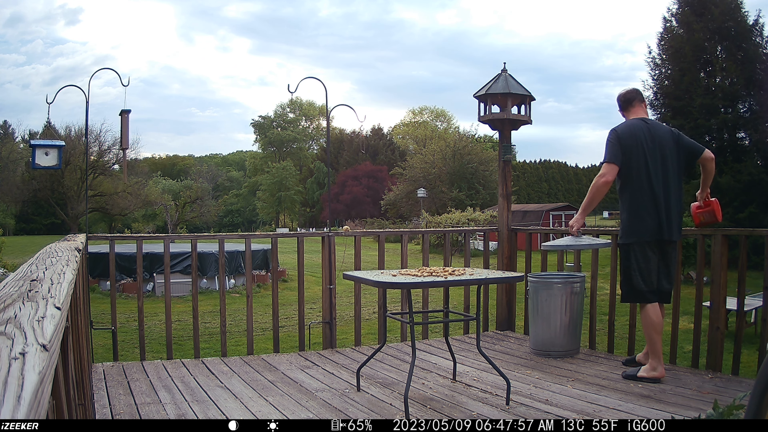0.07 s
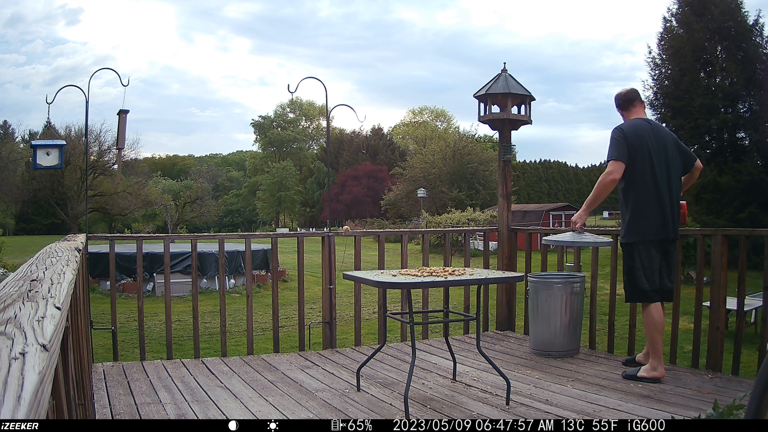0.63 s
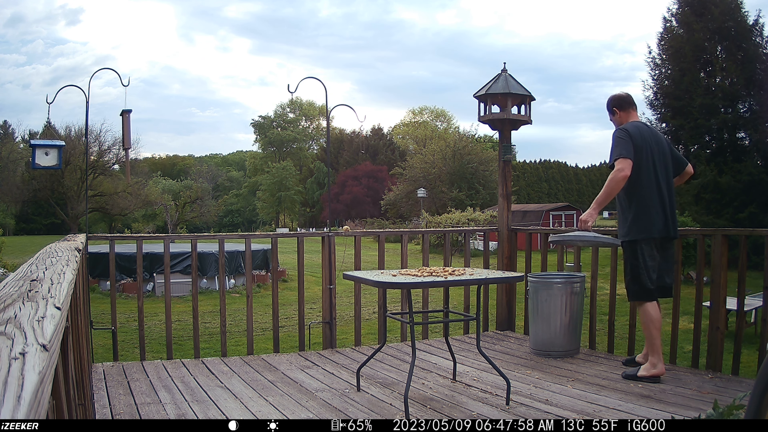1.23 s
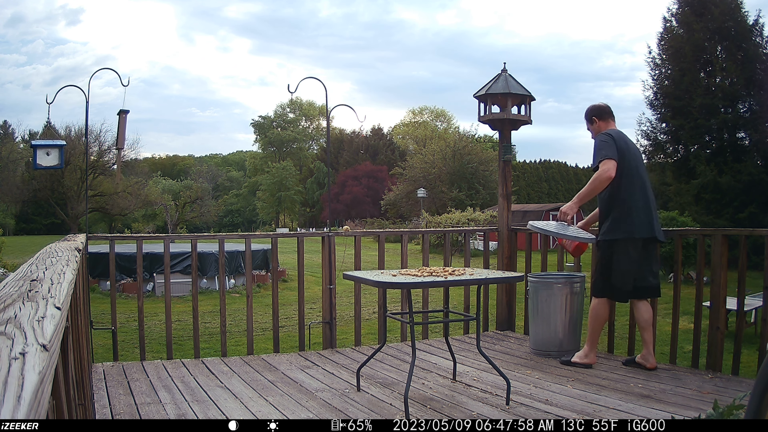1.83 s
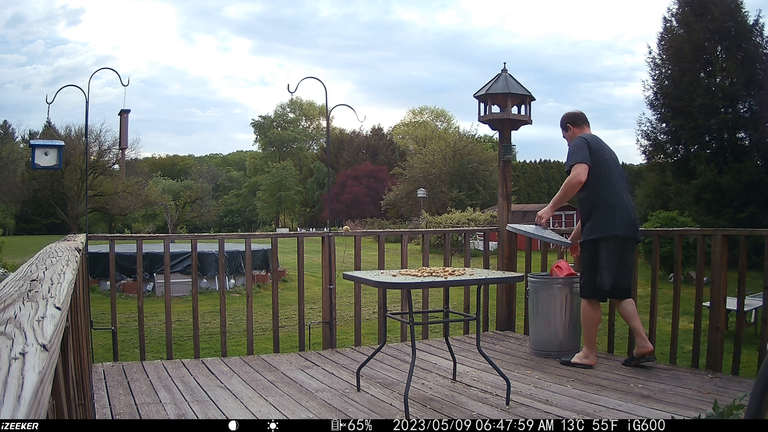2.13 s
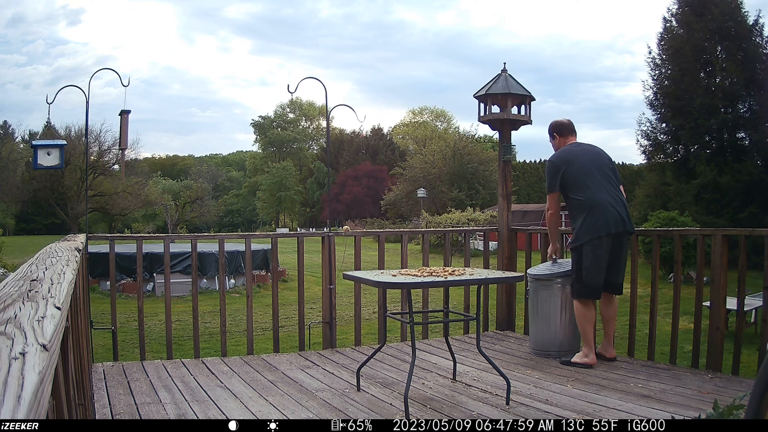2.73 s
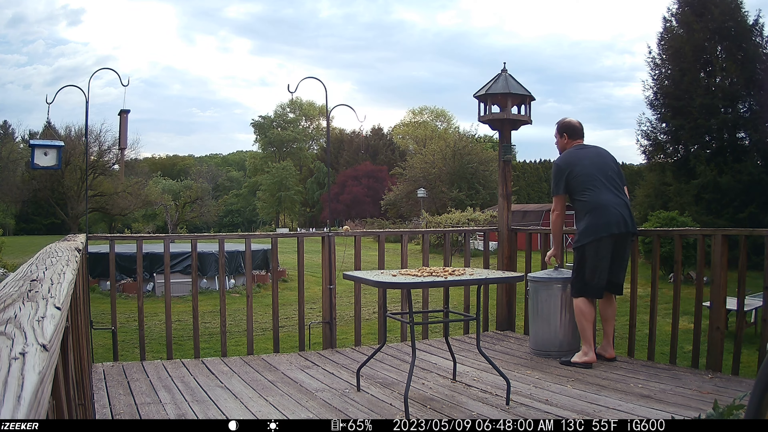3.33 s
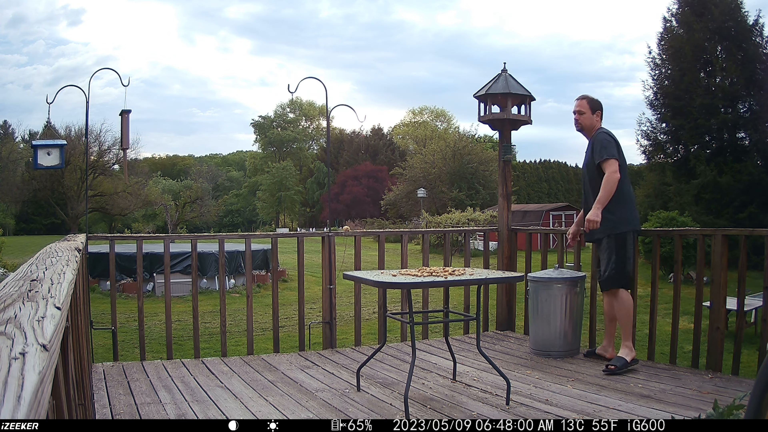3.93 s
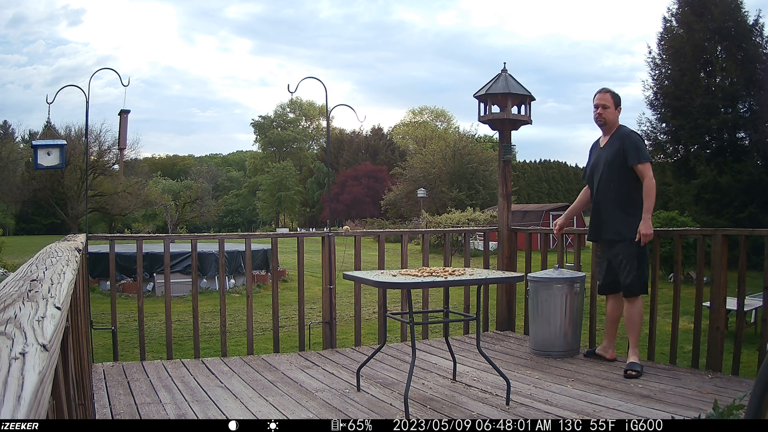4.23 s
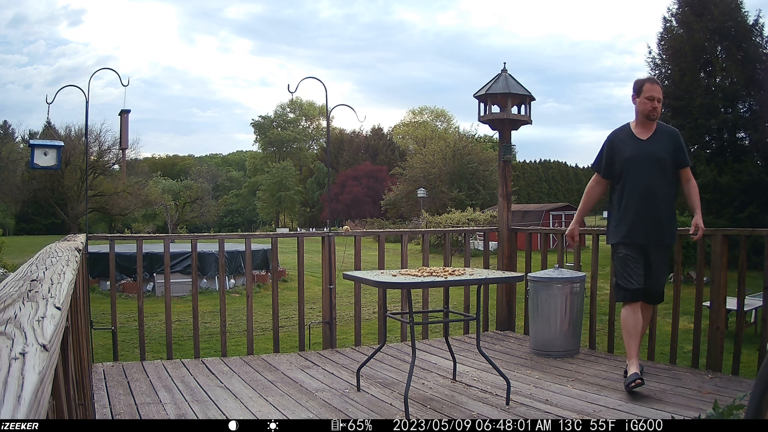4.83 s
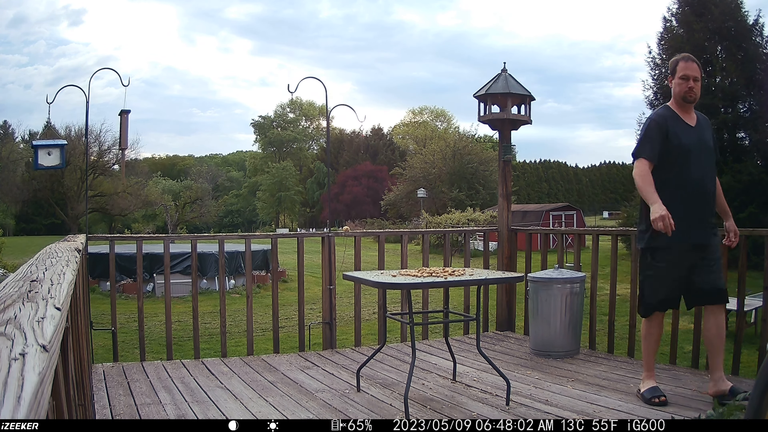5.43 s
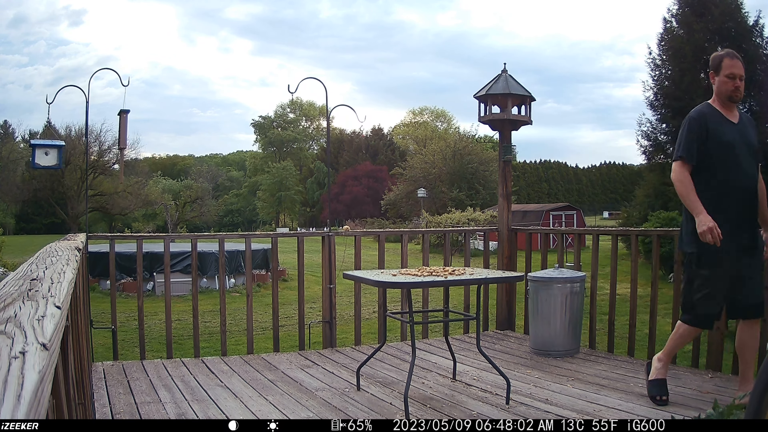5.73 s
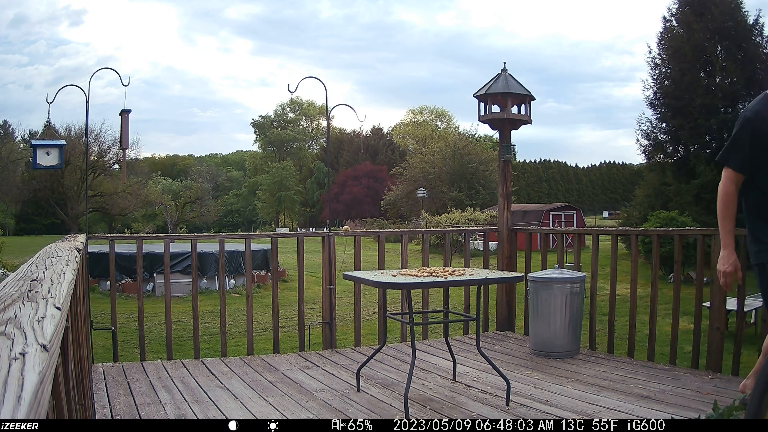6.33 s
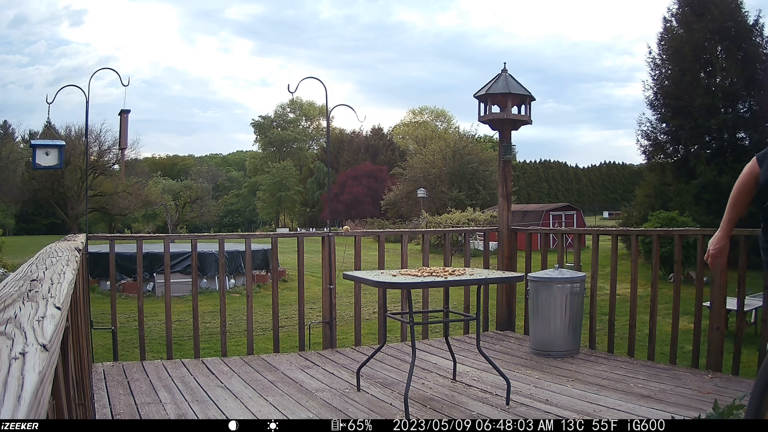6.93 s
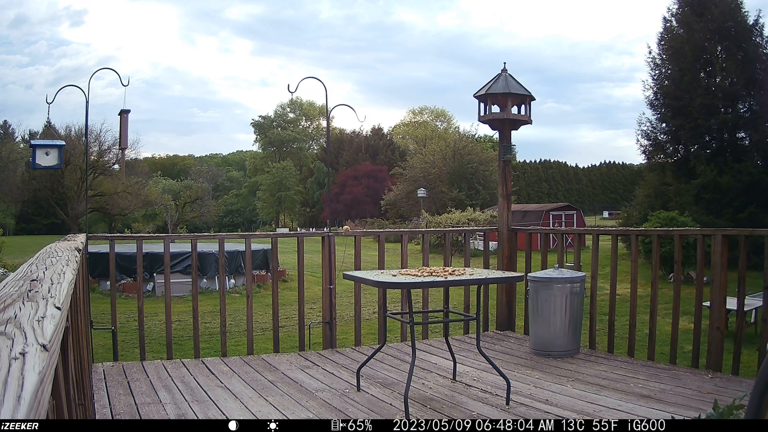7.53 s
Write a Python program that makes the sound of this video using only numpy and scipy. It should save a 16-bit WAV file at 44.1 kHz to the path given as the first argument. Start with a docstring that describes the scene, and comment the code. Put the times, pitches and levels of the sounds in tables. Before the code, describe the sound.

Faint birds chirp over a low outdoor rumble as a metal trash can lid clangs shut, followed by soft steps and close crackling.

```python
"""A sheet-metal lid is knocked, then clattered down onto a trash can on a wooden deck, a few metres
from a small camera's microphone. Each blow crashes through the sheet and sets lid and can ringing;
the air inside booms as the lid closes. Sandals scuff the boards, and something rustles and crackles
right beside the microphone. Songbirds call from the trees over a faint rumble and far traffic."""
import sys
import numpy as np
from scipy import signal
from scipy.fft import rfft, irfft
from scipy.io import wavfile
from scipy.ndimage import uniform_filter1d

SR = 44100
rng = np.random.default_rng(int(sys.argv[2]) if len(sys.argv) > 2 else 0)


def to_wav(s):
    """Save 16-bit WAV."""
    ch = np.atleast_2d(s).T  # columns
    pcm = np.round(np.clip(ch, -1, 1) * 32767)  # PCM
    wavfile.write(sys.argv[1], SR, pcm.astype(np.int16))


N = 339129
T = np.arange(N) / SR
# spectrum of whatever rustles and crackles beside the microphone: frequency_hz, density_db
RUSTLE_SPECTRUM = [(200, 2.5), (520, -3.5), (800, 4.5), (1250, 3.5), (2100, -4), (3400, 1.5), (4400, -1.5),
                   (6500, 1), (8200, -0.5), (10500, -7), (15000, -11)]


def lid():
    """Lid and can a few metres off: the metal crashes and rings, and the air shut inside booms."""
    # booms of the enclosed air: start_s, pitch_hz, level_db, t60_s
    booms = [(2.89, 97, -33, 0.48), (2.965, 138, -32, 0.12), (3.132, 110, -45.5, 0.21)]
    out, t = crash() + ring(), T[:SR]
    for s, hz, db, t60 in booms:
        add(out, s, undb(db) * np.sin(2 * np.pi * hz * t) * fade(t, t60))
    return outdoors(out, wet_db=-29.5, t60=.81, build_s=.05, dull_hz=1470)


def contacts(first_gap_s=.009, gap_ratio=.95):
    """Every blow of the lid and its rebounds, each sooner and weaker, in time order."""
    # blows of the lid, damped by hand and rim:
    # start_s, level_db, bass_db, treble_db, ring_db, clang_db, damping_db_per_s, rattle_s
    blows = [(2.267, -55.5, 3, 9, -12.5, 8.5, 235, .026), (2.7866, -47.5, 5, -2, -11, 5, 193, .012),
             (2.859, -37.5, 0, -1.5, -12.5, 12.5, 97, 0), (2.8903, -32.5, -0.5, 0, -10, 12.5, 77, .012),
             (2.924, -38, 5.5, 3, 0.5, -13, 200, 0), (2.9497, -37.5, 4, 6.5, -3, -17, 124, 0),
             (2.9627, -30, 7, -1.5, 0, -23, 167, .022), (2.992, -29.5, 5, -2, -5.5, -1.5, 155, .03),
             (3.045, -41, -4, -6, -8, 17, 2, 0), (3.13, -33, -2.5, -18.5, -14, 9, 180, .012)]
    gaps = first_gap_s * gap_ratio ** np.arange(10)
    rows = []
    for s, db, bass_db, treble_db, ring_db, clang_db, damping, rattle_s in blows:
        for k, late in enumerate([0, *np.cumsum(gaps)]):
            if late <= rattle_s:
                # each rebound lands more on the edge: less bass, more clang
                rows.append((s + late, db - 3 * k, bass_db - 4 * k, treble_db,
                             ring_db, clang_db + 3 * k, damping))
    return sorted(rows)


def push(hz, bass_db, treble_db, bass_hz=650, treble_hz=3200):
    """How hard a blow drives each frequency: flat blows push the low modes, edge blows the high."""
    return undb(bass_db / (1 + (hz / bass_hz) ** 4) + treble_db / (1 + (treble_hz / hz) ** 2))


def crash(ripple_db=1.5, ripple_from_hz=1500, tick_db=-6.5, tick_t60=.036):
    """Each contact gives a tick and a crash of crowded sheet modes, each band dying at its own rate."""
    # overlapping modes of the sheet metal: frequency_hz, density_db, t60_s
    sheet_bands = [(82.5, -11, 0.56), (151, 1, 0.46), (252, -4.5, 1), (450, -2, 0.52), (660, -1, 0.78),
                   (760, -7.5, 0.85), (1080, -3.5, 0.55), (1420, -6, 0.13), (2220, -9, 0.66),
                   (3430, -10, 0.52), (4530, -5.5, 0.38), (7350, -8.5, 0.25), (9360, -19.5, 0.54),
                   (15000, -29, 0.42)]
    hz, db, t60 = np.transpose(sheet_bands)
    out, t = np.zeros(N), T[:2 ** 15]
    f = freqs(t)
    # the same sheet answers every blow, so its fine peaks and dips stay put
    ripple = unit(uniform_filter1d(rng.standard_normal(len(f)), size=24)) * f / (f + ripple_from_hz)
    sheet = unit(undb(np.interp(np.log(f), np.log(hz), db) + ripple_db * ripple))
    bands = np.array([np.interp(np.log(f), np.log(hz), row) for row in np.eye(len(hz))])
    decays = np.array([fade(t, s) for s in t60])
    for s, level_db, bass_db, treble_db, _, _, damping in contacts():
        body, contact = rfft(rng.standard_normal((2, len(t)))) * sheet * push(f, bass_db, treble_db)
        wash = np.sum(irfft(body * bands) * decays, axis=0)
        tick = undb(tick_db) * fade(t, tick_t60) * irfft(contact)
        add(out, s, (wash + tick) * undb(level_db - damping * t))
    return out


def ring(rim_hz=1740, rim_width_hz=300):
    """The clear modes gather energy from every contact and lose it again until the next."""
    # clear modes of lid and can: pitch_hz, level_db, t60_s
    modes = [(192, -11, .35), (302, -10, .45), (322, -14, .45), (344, -13, .6), (411, -12, .4),
             (448, -8, .35), (478, -8, .35), (543, -12, .4), (643, -3, .5), (718, -13, .45), (868, -9, .5),
             (1028, -12, .44), (1200, -9, .46), (1400, -10, .45), (1545, -12, .25), (1684, -7, .45),
             (1702, -12, .4), (1775, -14, .3), (1868, -14, .45), (2062, -11, .55), (2126, -16, .5),
             (2444, -14, .4), (2576, -13, .42), (2727, -12, .42), (3219, -13, .4), (4531, -10, .35),
             (4560, -9, .35), (4748, -12, .35), (5632, -14, .32)]
    hz, db, t60 = np.transpose(modes)[:, :, None]
    out, energy = np.zeros(N), 0
    phase = 2 * np.pi * rng.random(hz.shape)
    rim = 1 / (1 + ((hz - rim_hz) / rim_width_hz) ** 2)
    hits = contacts()
    ends = [row[0] for row in hits[1:]] + [hits[-1][0] + 1]
    for (s, level_db, bass_db, treble_db, ring_db, clang_db, damping), end in zip(hits, ends):
        t = T[:max(int(end * SR) - int(s * SR), 1)]
        kick = undb(level_db + ring_db + db + clang_db * rim) * push(hz, bass_db, treble_db)
        swing = np.sqrt(energy + kick ** 2) * np.exp(-np.log(1000) * t / t60) * undb(-damping * t)
        # each contact also jolts the modes out of step, which roughens the ring
        angle = phase + .5 * rng.standard_normal(hz.shape) + 2 * np.pi * hz * t
        add(out, s, np.sum(swing * np.sin(angle), axis=0))
        energy, phase = swing[:, -1:] ** 2, angle[:, -1:]
    return out


def steps():
    """A sandal brushes the boards while the deck thuds under the weight."""
    # footfalls: start_s, scuff_length_s, scuff_db, thud_db
    footfalls = [(1.58, .097, -73.5, -78), (2.308, 0.086, -67.5, -49), (2.397, 0.026, -62, -72),
                 (4.305, .049, -72.5, -65), (4.777, 0.043, -67.5, -71), (5.101, 0.034, -73, -60),
                 (5.67, .059, -71.5, -69), (6.404, 0.025, -64, -55), (6.84, 0.049, -74, -52.5)]
    # spectra of sole and deck: frequency_hz, density_db
    sole = [(150, 6.5), (700, 1), (2000, 1.5), (6000, -1.5), (15000, -11)]
    deck = [(15, -6), (40, 5), (80, -11.5), (180, -10.5), (400, -22), (2000, -56)]
    out, t = np.zeros(N), T[:SR // 2]
    for s, length, scuff_db, thud_db in footfalls:
        grit, weight = rng.standard_normal((2, len(t)))
        stroke = 3 * t / length
        scuff = colour(grit, sole) * stroke * np.exp(1 - stroke)
        thud = colour(weight, deck) * fade(t, t60=.29) * (1 - np.exp(-t / .008))
        add(out, s, undb(scuff_db) * scuff + undb(thud_db) * thud)
    return out


def rustle(slips_per_s=3500, catch_db=2, catch_hz=130):
    """Right beside the microphone, a dense run of tiny slips catches unevenly."""
    sizes = undb(3 * np.minimum(rng.exponential(size=N), 3))
    slips = (rng.random(N) < slips_per_s / SR) * rng.choice([-1, 1], N) * sizes
    friction = colour(unit(slips) + .5 * rng.standard_normal(N), RUSTLE_SPECTRUM)
    return friction * rustle_level() * undb(catch_db * walk(catch_hz))


def rustle_level(from_s=7.095, to_s=7.235, hold_db=-53.5, rise_db_per_s=162, drop_db_per_s=230):
    """The rustle swells, holds and drops quickly, then settles slowly."""
    before, after = np.maximum(from_s - T, 0), np.maximum(T - to_s, 0)
    settle_db = -8 - 32 * after
    release_db = np.maximum(-drop_db_per_s * after, settle_db)
    return undb(hold_db - rise_db_per_s * before + release_db)


def crackles(body_db=-2, gain_db=-2, t60=.022):
    """Sharp ticks and crackles close by: one tick with a footfall, the rest around the rustle."""
    # ticks and crackles: start_s, peak_db (before gain_db), centre_hz
    ticks = [(6.4004, -44.5, 3800), (7.009, -42.5, 8740), (7.082, -36, 6080), (7.1017, -34.5, 8050),
             (7.1374, -40, 8350), (7.1828, -35, 6850), (7.204, -30, 6660), (7.2292, -37, 4360),
             (7.293, -41.5, 2340), (7.3283, -40, 4380), (7.3587, -41.5, 6210), (7.3906, -41, 1550),
             (7.427, -46, 3900), (7.4835, -43, 5760)]
    out, t = np.zeros(N), T[:SR // 10]
    for s, db, hz in ticks:
        tick_noise, body_noise = rng.standard_normal((2, len(t)))
        body = undb(body_db) * colour(body_noise, RUSTLE_SPECTRUM)
        tick = (resonate(tick_noise, hz, width_hz=hz / 2) + body) * fade(t, t60)
        add(out, s, undb(db + gain_db) * tick / np.abs(tick).max())
    return out


def near_birds(whistle_s=.074, climb_s=.055):
    """Short, clean whistles and warbled carols from the nearer trees."""
    # whistles: start_s, pitch_hz, glide_hz_per_s, level_db
    whistles = [(.43, 3300, -2000, -74), (1.015, 3290, -2200, -74.5), (1.39, 3100, -5000, -80),
                (1.617, 3250, -1500, -73.5), (2.369, 2496, -1000, -74), (2.63, 2780, 3000, -74),
                (3.46, 5270, -2, -75.5), (3.635, 6200, -2, -78), (3.74, 3650, 2200, -74),
                (3.965, 3700, 2200, -74.5), (4.015, 2590, -700, -77), (4.068, 2940, 0, -78.5),
                (4.2, 3680, 2197, -76), (4.528, 3060, -1200, -76.5), (5.115, 3360, -2000, -78.5),
                (5.18, 2500, -3000, -77), (5.794, 2670, -4000, -75), (6.515, 2140, -3000, -76),
                (6.587, 3230, -1500, -74), (6.885, 2550, 700, -73.5), (7.455, 6000, -7000, -72),
                (7.535, 5850, -7000, -70)]
    # phrases that climb to a top note and step down: top_s, top_hz, fall_s, level_db
    carols = [(1.69, 3430, 0.12, -72.5), (6.345, 3450, 0.13, -73), (6.985, 3310, .08, -68.5),
              (7.535, 3420, 0.21, -71)]
    out = np.zeros(N)
    for s, hz, glide, db in whistles:
        bend = glide * whistle_s / 2
        add(out, s, undb(db) * note(whistle_s, hz - bend, hz, hz + bend, warble=.1))
    for s, top_hz, fall_s, db in carols:
        add(out, s - climb_s, undb(db) * carol(top_hz, climb_s, fall_s))
    return outdoors(out, wet_db=-9, t60=.4, build_s=.01, dull_hz=6000)


def carol(top_hz, climb_s, fall_s, overlap_s=.0143, scatter=.0255):
    """Three syllables run together, each a little off pitch: a climb, a steep fall, a low note."""
    out, step_s = np.zeros(N), fall_s / 2
    first, via, last = .77, .7, .61  # shares of the top pitch
    syllables = [(0, climb_s, first, (first + 1) / 2, 1),
                 (climb_s, step_s, 1, (1 + via) / 2, via),
                 (climb_s + step_s, step_s, via, last, last)]
    for s, length, *shares in syllables:
        pitches = top_hz * np.array(shares) * (1 + scatter * rng.standard_normal())
        add(out, s, note(length + overlap_s, *pitches, warble=.58))
    return out[:SR]


def note(length_s, start_hz, middle_hz, end_hz, warble, warble_hz=75, depth=.097):
    """A bird's whistle glides through three pitches with a quick, uneven warble."""
    u = np.linspace(0, 1, int(length_s * SR))
    glide = np.polyval(np.polyfit([0, .5, 1], [start_hz, middle_hz, end_hz], 2), u)
    drift = np.interp(u, np.linspace(0, 1, 8), rng.standard_normal(8))
    trill = np.sin(2 * np.pi * np.cumsum(warble_hz * (1 + .25 * drift)) / SR)
    pitch_hz = glide * (1 + depth * warble * trill)
    return np.sqrt(2) * np.sin(np.pi * u) * np.sin(2 * np.pi * np.cumsum(pitch_hz) / SR)


def far_birds(count=140, level_db=-81):
    """A faint chorus of random notes from farther off, smeared more by the trees."""
    out = np.zeros(N)
    for when, height, slope, span, warble in rng.random((count, 5)):
        hz, bend = 2200 * 2.6 ** height, 1 + .3 * (slope - .5)
        chirp = note(.033 + .052 * span, hz * bend, hz, hz / bend, warble)
        add(out, when * T[-1], undb(level_db - 3 * height) * chirp)
    return outdoors(out, wet_db=-3, t60=.5, build_s=.02, dull_hz=6000)


def air(start_db=-62, rise_db_per_s=.24):
    """Even, distant rumble and hiss around the deck, creeping up in level."""
    # open-air spectrum: frequency_hz, density_db
    spectrum = [(15, -21), (25, 3), (75, -1.5), (122, -10.5), (221, -13.5), (305, -12.5), (410, -18),
                (582, -19.5), (648, -22), (782, -21), (1950, -30), (3340, -33), (5880, -36.5),
                (13900, -38.5), (15500, -43)]
    return colour(rng.standard_normal(N), spectrum) * undb(start_db + rise_db_per_s * T)


def traffic(waver_db=1, waver_hz=5.1):
    """Far traffic drones in two narrow bands that waver and slowly swell."""
    # bands of the drone: centre_hz, width_hz, level_db (before the swell)
    bands = [(326.4, 89, -74.5), (659, 63, -79.5)]
    # swell of the drone: time_s, gain_db
    swell = [(0, -7), (2, 0.5), (4, 1.5), (6, 0.5), (7.69, 6)]
    out = np.zeros(N)
    for hz, width_hz, db in bands:
        band = resonate(rng.standard_normal(N), hz, width_hz)
        out += resonate(band, hz, width_hz) * undb(db + waver_db * walk(waver_hz))
    return out * undb(np.interp(T, *np.transpose(swell)))


def outdoors(x, wet_db, t60, build_s, dull_hz):
    """Direct sound plus a dull scatter from house and trees."""
    t = T[:SR]
    tail = rng.standard_normal(SR) * fade(t, t60) * (1 - np.exp(-t / build_s))
    tail = signal.lfilter(*signal.butter(1, dull_hz, fs=SR), tail)
    return x + undb(wet_db) * signal.fftconvolve(x, tail / np.linalg.norm(tail))[:N]


def undb(db):
    """Decibels to gain."""
    return 10 ** (np.asarray(db) / 20)


def unit(x):
    """Scale to rms 1."""
    return x / np.sqrt(np.mean(x ** 2))


def add(out, s, x):
    """Mix x into out from time s."""
    i = int(s * SR)
    out[i:i + len(x)] += x[:N - i]


def freqs(x):
    """Frequencies of the spectrum of x, floored at 1 Hz."""
    return np.maximum(np.fft.rfftfreq(len(x), 1 / SR), 1)


def colour(x, points):
    """Filter by a (frequency_hz, density_db) spectrum; rms 1."""
    hz, db = np.transpose(points)
    gain = undb(np.interp(np.log(freqs(x)), np.log(hz), db))
    return unit(irfft(rfft(x) * gain, len(x)))


def resonate(x, hz, width_hz):
    """One resonance; rms 1."""
    return unit(signal.lfilter(*signal.iirpeak(hz, hz / width_hz, fs=SR), x))


def fade(t, t60):
    """Free decay by 60 dB in t60 seconds."""
    return np.exp(-np.log(1000) * t / t60)


def walk(rate_hz):
    """Random wandering, spread near 1."""
    knots = np.arange(0, T[-1] + 1, 1 / rate_hz)
    return np.interp(T, knots, rng.standard_normal(len(knots)))


def scene():
    """Deck, trees and distance as they reach the one microphone."""
    return (lid() + steps() + rustle() + crackles() + near_birds() + far_birds() + air() + traffic())[None]


def record(dry):
    """The camera cuts the treble above 15.6 kHz."""
    return signal.sosfilt(signal.ellip(10, .2, 70, 15600, fs=SR, output="sos"), dry)


dry = scene()
out = record(dry)
to_wav(out)
```